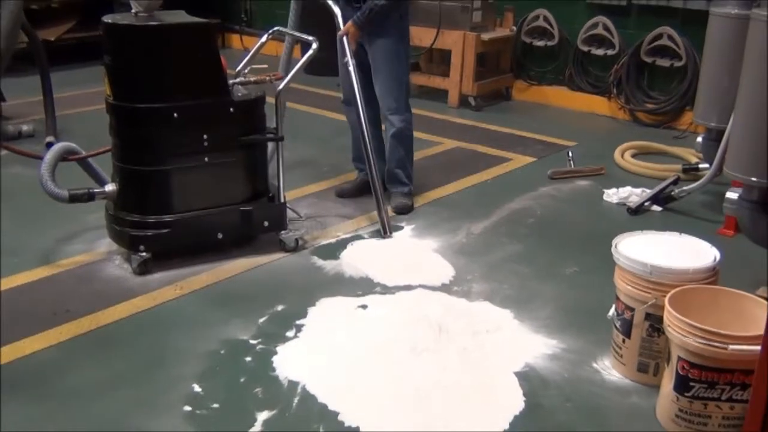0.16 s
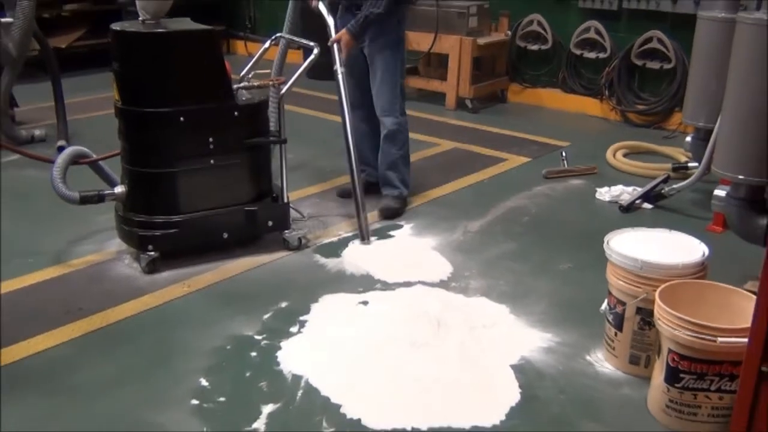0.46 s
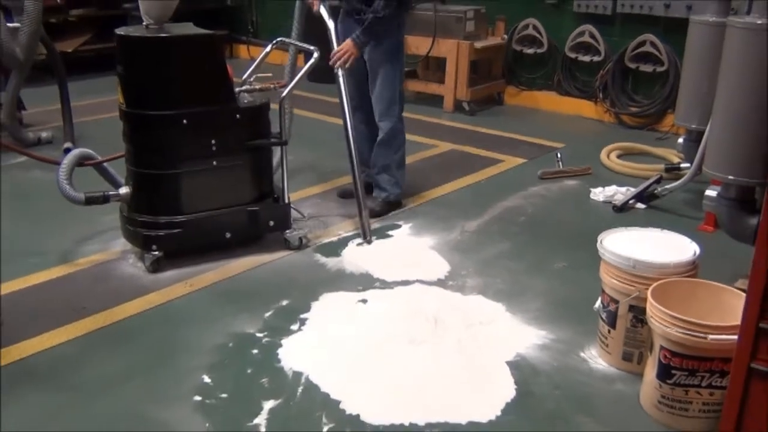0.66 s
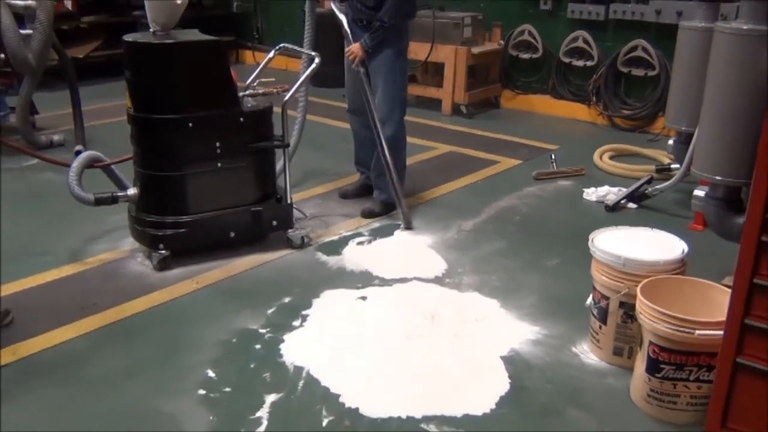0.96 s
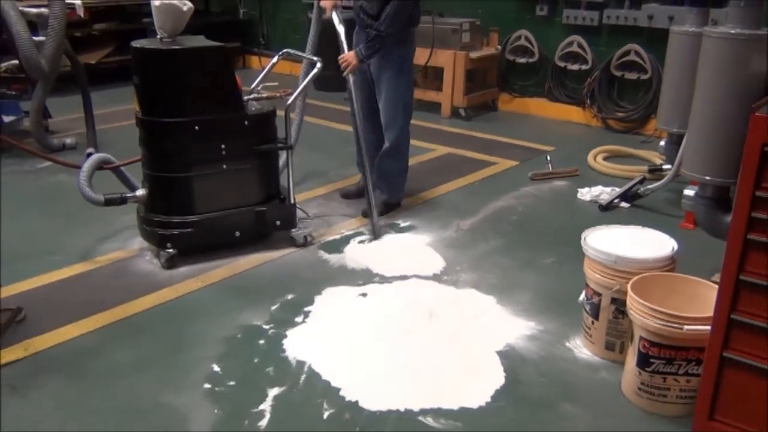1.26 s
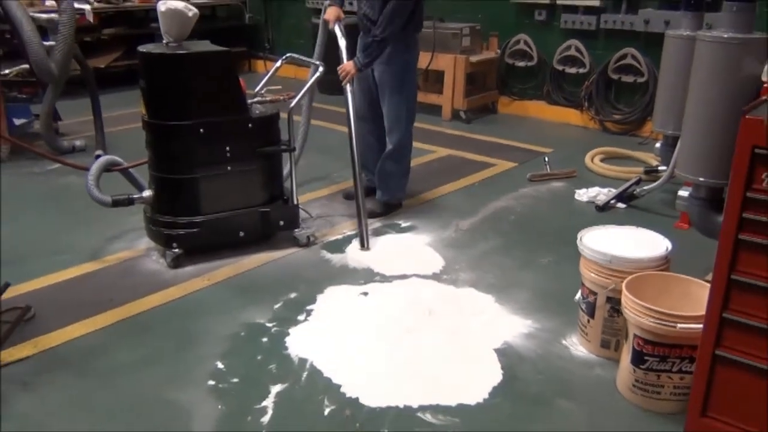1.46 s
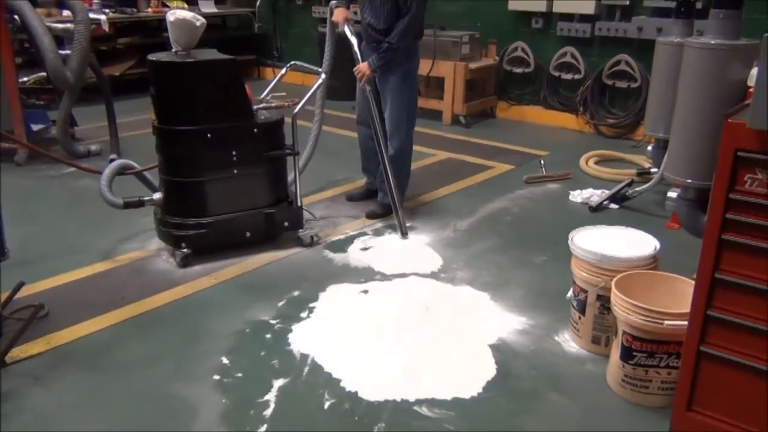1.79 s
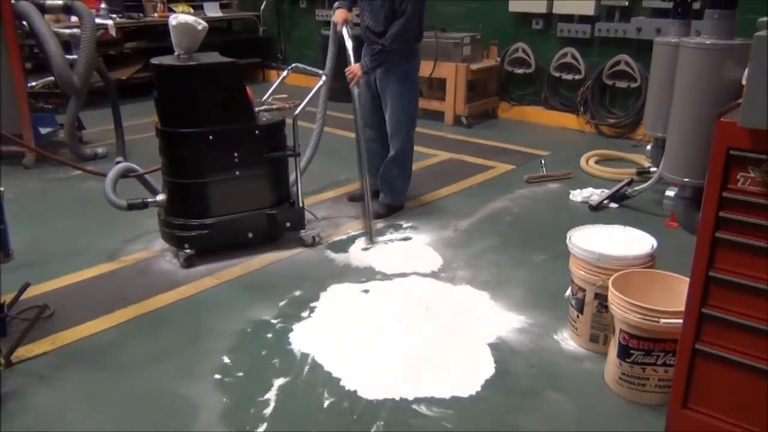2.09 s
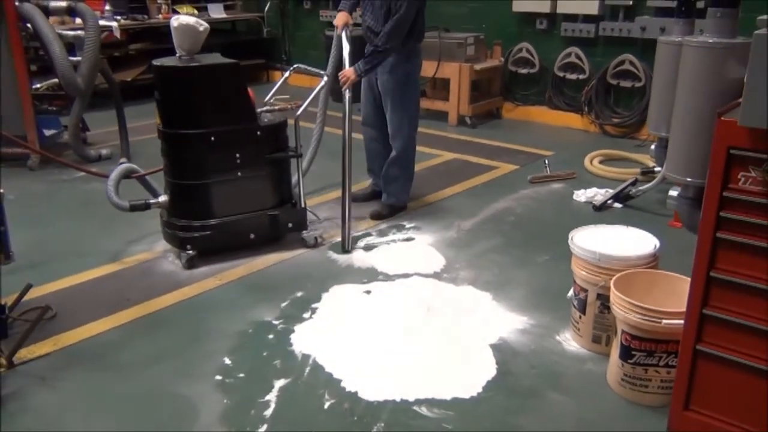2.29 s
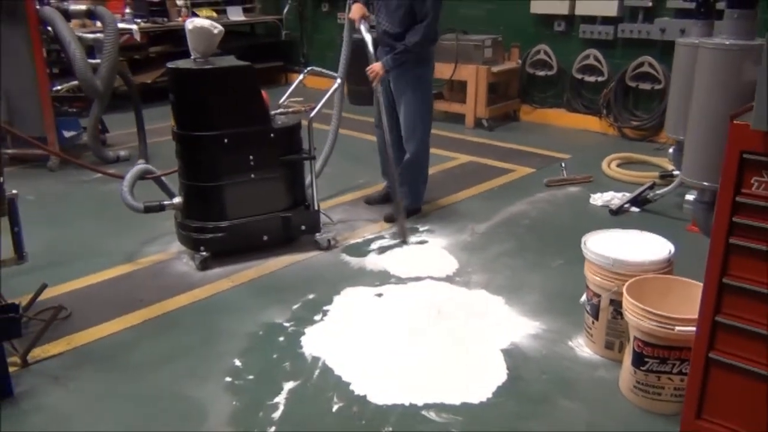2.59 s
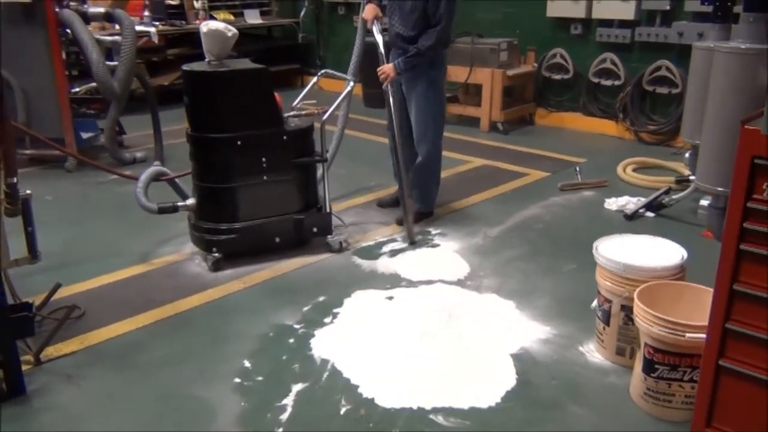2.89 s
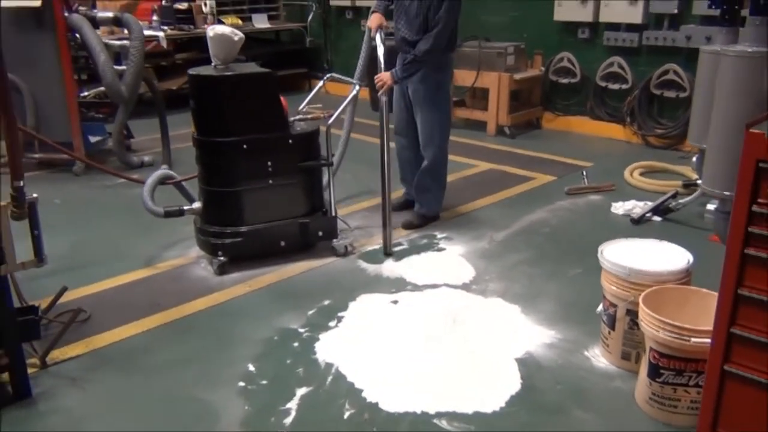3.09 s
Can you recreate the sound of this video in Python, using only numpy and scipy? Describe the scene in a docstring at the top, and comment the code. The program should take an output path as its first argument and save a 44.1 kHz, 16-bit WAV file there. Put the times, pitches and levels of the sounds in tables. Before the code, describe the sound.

Loud, steady industrial vacuum suction with a hollow midrange drum roar, airy hiss and thin wavering whistles. Gritty powder ticks through the metal wand, sparse at first, then busier, with slight workshop echo and faint mains hum.

```python
"""First comes the roar of a compressed-air vacuum at full suction: noise shaped by drum resonances, with gusts.
Over it the nozzle hisses as the wand sweeps, bands of air swell and fade as filtered noise,
and three thin whistles, near sines, waver in the air stream.
Clumps of powder rattle up the wand as ringing bursts of grains that echo in a large workshop.
Steady tones of mains hum lie below."""
import sys
import numpy as np
from scipy import signal
from scipy.fft import rfft, irfft, next_fast_len
from scipy.io import wavfile

SR = 44100
rng = np.random.default_rng(int(sys.argv[2]) if len(sys.argv) > 2 else 0)


def log_audio(samples):
    """Write samples as a 16-bit WAV file to the path given in sys.argv[1]."""
    # one column per channel
    frames = np.atleast_2d(samples).T
    # limit to full scale, then quantise
    limited = np.clip(frames, -1, 1)
    pcm = np.round(limited * 32767).astype(np.int16)
    wavfile.write(sys.argv[1], SR, pcm)


N = 143325


def from_db(db):
    """Turn decibels into amplitude gain."""
    return 10 ** (np.asarray(db) / 20)


def rms_one(x):
    """Scale a signal to unit rms."""
    return x / np.sqrt(np.mean(x ** 2) + 1e-20)


def in_time(rows):
    """Draw each column of a time table as straight lines, one value per sample."""
    s, *columns = np.transpose(rows)
    return [np.interp(np.arange(N) / SR, s, c) for c in columns]


def drift(rate_hz):
    """Slow random wandering of unit rms: noise through two equal low-pass poles."""
    step = 40  # samples between slow values
    r = np.exp(-2 * np.pi * rate_hz * step / SR)
    noise = rng.standard_normal(N // step + 2002)
    slow = signal.lfilter([1], [1, -2 * r, r * r], noise)[2000:]  # drop the filter's settling
    return np.interp(np.arange(N) / step, np.arange(len(slow)), rms_one(slow))


def resonance(x, hz, width_hz):
    """Two-pole resonance with a gain of about 1 on top."""
    r = np.exp(-np.pi * width_hz / SR)
    zeros = np.array([1, 0, -1]) * (1 - r * r) / 2
    poles = [1, -2 * r * np.cos(2 * np.pi * hz / SR), r * r]
    return signal.lfilter(zeros, poles, x)


def twice_resonant(x, hz, first_width_hz, second_width_hz):
    """Two resonances in a row at one pitch, scaled to unit rms."""
    return rms_one(resonance(resonance(x, hz, first_width_hz), hz, second_width_hz))


def shelf(x, hz, side, db):
    """Lift or sink what lies on one side of hz."""
    low_or_high = signal.butter(3, hz, side, fs=SR, output="sos")
    return x + (from_db(db) - 1) * signal.sosfiltfilt(low_or_high, x)


def air(spectrum, peaks, patchy_db, own_db, rate_hz, centres_hz):
    """Turbulent noise of unit rms: a sloped spectrum, resonant humps and partly shared gusts."""
    hz = np.maximum(np.arange(N // 2 + 1) * SR / N, 1)
    f, db = np.transpose(spectrum)
    shape = np.interp(np.log(hz), np.log(f), db)
    octaves_outside = np.maximum(np.log2(f[0] / hz), 0) + np.maximum(np.log2(hz / f[-1]), 0)
    shape -= 30 * octaves_outside  # dB per octave beyond the table
    for centre, width, lift in peaks:
        shape += lift / (1 + (2 * (hz - centre) / width) ** 2)
    coloured = rfft(rng.standard_normal(N)) * from_db(shape)
    together = drift(rate_hz)
    out = 0
    for centre in centres_hz:
        distance = np.log(hz / centre) / np.log(centres_hz[1] / centres_hz[0])
        window = np.cos(np.pi / 2 * np.clip(distance, -1, 1)) ** 2
        gust_db = patchy_db * together + own_db * drift(rate_hz / 4)
        out = out + irfft(coloured * window, N) * from_db(gust_db)
    return rms_one(out)


# mains tones: pitch_hz [Hz], level_db [dB rms]
MAINS_TONES = [(59.8, -49), (118, -62), (179.5, -51)]


def hum():
    """Mains hum: steady sines with random starting phases."""
    t = np.arange(N) / SR
    out = np.zeros(N)
    for hz, db in MAINS_TONES:
        out += np.sqrt(2) * from_db(db) * np.sin(2 * np.pi * (hz * t + rng.random()))
    return out


SHOP_T60_S, SHOP_SHARE = .5, .4  # decay time in the bass, amplitude share of the echoes


def shop(x):
    """Eight feedback delays between the walls, duller on every round; level kept."""
    size = next_fast_len(N + SR)
    hz = np.arange(size // 2 + 1) * SR / size
    lags_s = np.array([.0231, .0277, .0313, .0359, .0411, .0457, .0509, .0583])
    t60 = SHOP_T60_S / (1 + hz / 9000)
    walls = 0
    for lag in lags_s:
        g = from_db(-60 * lag / t60) * np.exp(-2j * np.pi * hz * lag)  # one round trip
        walls = walls + g / (1 - g) * np.sqrt(1 - abs(g) ** 2) / abs(g)
    walls = walls / np.sqrt(len(lags_s))
    mix = np.sqrt(1 - SHOP_SHARE ** 2) + SHOP_SHARE * walls
    return irfft(rfft(x, size) * mix, size)[:N]


CLUMP_GRAINS_PER_S, CLUMP_WIDTH = 1500, .22  # strong grains, ring width as a share of its pitch
CLUMP_CRACK_DB = -14.0  # bright crack against the ring


def clump(hz, ms):
    """A burst of grains rings the wand and adds a bright crack; it rises faster than it fades."""
    t = (np.arange(2048) - 512) / SR  # zero at the peak
    born, size = rng.random((2, len(t)))
    strength = 0.35 + 3 * (born < CLUMP_GRAINS_PER_S / SR)  # fine bed and strong grains
    grains = strength * (size - .5)
    width_hz = CLUMP_WIDTH * hz
    ring = twice_resonant(grains, hz, width_hz, 1.6 * width_hz)
    crack = rms_one(resonance(grains, 5900, 7000))
    shape = np.exp(-(t / np.where(t < 0, .28, .75) / ms * 1000) ** 2)
    burst = (ring + from_db(CLUMP_CRACK_DB) * crack) * shape
    # scale so the burst's energy is twice the envelope's, whatever the grains
    return burst * np.sqrt(2 * np.sum(shape ** 2) / np.sum(burst ** 2))


GRIT_PER_S, GRIT_DB, GRIT_HZ = 310, -47.5, 5940  # loose grit between the clumps


def grit(sweep_db):
    """Random single grains tick through two wand resonances, louder and softer with the sweep."""
    ticks = (rng.random(N) < GRIT_PER_S / SR) * rng.laplace(0, 1, N) + 1e-18
    ringing = twice_resonant(ticks, GRIT_HZ, 1800, 3000)
    return from_db(GRIT_DB + sweep_db - sweep_db.mean()) * ringing


# clumps of powder in the wand: peak_s [s], level_db [dB, relative], centre_hz [Hz], length_ms [ms]
CLUMPS = [(0.411, -32, 6500, 4.4), (0.424, -30.5, 5700, 5), (0.557, -36, 6500, 5.5),
          (.7244, -33, 6200, 4.6), (.818, -47, 12500, 6), (0.849, -34, 5600, 4), (1.185, -29.5, 5930, 4.4),
          (1.2922, -34, 5730, 5), (1.6597, -35, 4900, 4.6), (1.673, -35, 6200, 3.6), (2.329, -34, 5000, 5),
          (2.4184, -35, 6100, 4), (2.435, -36, 5400, 6), (2.477, -42, 5000, 4), (2.5232, -30, 5300, 3.4),
          (2.542, -32.5, 6300, 9.6), (2.577, -40, 5550, 4), (2.603, -30.5, 5370, 9), (2.605, -41, 9100, 11),
          (2.634, -35, 5600, 6), (2.691, -34.5, 4960, 11), (2.806, -35, 5000, 4), (2.896, -30.5, 5930, 6),
          (2.9603, -29, 5530, 4.6), (3.0295, -29.5, 5600, 6), (3.0454, -33, 5000, 6), (3.101, -43, 5500, 4),
          (3.205, -35, 5800, 4.4), (3.231, -30.5, 5640, 8.4), (3.231, -45, 13000, 6)]


def powder(sweep_db):
    """Clumps rattle up the wand, and loose grit ticks in between."""
    out = np.zeros(N + 2048)
    for s, db, hz, ms in CLUMPS:
        burst = clump(hz, ms)
        start = int(s * SR) - 512
        out[start:start + len(burst)] += from_db(db) * burst
    return out[:N] + grit(sweep_db)


def whistle(ends_hz, rows, waver_hz, flutter_db, order=1):
    """A near sine that creeps up in pitch, wanders a little and flutters in strength."""
    db, = in_time(rows)
    pitch_hz = np.linspace(*ends_hz, N) + waver_hz * drift(20)
    phase = 2 * np.pi * order * np.cumsum(pitch_hz) / SR
    return np.sqrt(2) * from_db(db + flutter_db * drift(15)) * np.sin(phase)


# strength of each whistle before flutter: time_s [s], level_db [dB rms]; the thin one's is its octave's
LOW_WHISTLE = [(0, -31), (.18, -31.5), (.22, -38), (.35, -35.5), (.5, -35.5), (.6, -45), (.7, -36),
               (.82, -36.5), (.89, -49), (1.04, -35.5), (1.1, -45), (1.18, -35), (1.29, -33), (1.36, -40),
               (1.53, -48), (1.64, -36), (1.75, -46), (1.82, -34), (1.89, -39), (1.98, -33), (2.15, -36),
               (2.37, -34), (2.43, -39), (2.65, -41), (2.73, -35), (3.0, -37), (3.11, -32), (3.25, -36)]
HIGH_WHISTLE = [(0, -46), (.07, -43), (.17, -50), (.33, -41), (.41, -47), (.48, -41), (.55, -47),
                (.63, -41), (.8, -43), (.93, -54), (.99, -42), (1.09, -53), (1.18, -35.5), (1.22, -47),
                (1.28, -42), (1.36, -52), (1.52, -41), (1.62, -47), (1.95, -48), (2.15, -44), (2.47, -51),
                (2.57, -37), (2.66, -44), (2.74, -50), (2.8, -36), (2.86, -47), (3.06, -38.5), (3.12, -53),
                (3.25, -46)]
THIN_WHISTLE = [(0, -59), (.5, -55), (.76, -50), (.9, -58), (1.13, -49), (1.4, -56), (2.05, -51),
                (2.3, -56), (2.6, -52), (3.05, -51), (3.25, -57)]
LOW_HZ, HIGH_HZ, THIN_HZ = (2143, 2151), (4077, 4090), (2354, 2359)  # pitch at start and end
THIN_FUNDAMENTAL_DB = 2.0  # above its octave


def whistles():
    """Three thin tones in the air stream, the thinnest with an octave that wavers on its own."""
    low = whistle(LOW_HZ, LOW_WHISTLE, waver_hz=.8, flutter_db=.6)
    high = whistle(HIGH_HZ, HIGH_WHISTLE, waver_hz=2.5, flutter_db=2.4)
    octave = whistle(THIN_HZ, THIN_WHISTLE, waver_hz=1.5, flutter_db=1.5, order=2)
    thin = whistle(THIN_HZ, THIN_WHISTLE, waver_hz=1.5, flutter_db=1.5)
    return low + high + octave + from_db(THIN_FUNDAMENTAL_DB) * thin


def singing(rows, hz, width_hz):
    """Noise through the same resonance twice, swelling and fading."""
    db, = in_time(rows)
    return from_db(db) * twice_resonant(rng.standard_normal(N), hz, width_hz, width_hz)


# bands of singing air: time_s [s], level_db [dB rms]
THROAT = [(0, -43), (.6, -36), (1.1, -26), (1.5, -32), (1.9, -28.5), (2.35, -28.5), (2.7, -24.5),
          (3.25, -31)]  # sings louder as powder chokes the flow
MOUTH = [(0, -42), (.25, -39), (.55, -39), (.8, -48), (1.1, -49), (1.6, -58), (3.25, -56)]  # wand mouth dragging on the floor
BODY = [(0, -28), (.3, -24.5), (.7, -27), (1.3, -32), (2.4, -33), (2.7, -28), (3.25, -36)]  # fuller roar just above the drum note at first
DRUM_NOTE = [(0, -31), (1.4, -26), (3.25, -32)]  # narrow wavering note under the drum's main hump
HIGH_BAND = [(0, -44), (.4, -40.5), (.85, -49), (1.3, -64), (3.25, -58)]  # high hiss, strong at first, then fading


def singing_bands():
    """Air sings in the throat, wand mouth and drum, with a broad high band of hiss."""
    throat = singing(THROAT, hz=1055, width_hz=154)
    mouth = singing(MOUTH, hz=4185, width_hz=240)
    body = singing(BODY, hz=648, width_hz=180)
    drum_note = singing(DRUM_NOTE, hz=423, width_hz=11)
    high_band = singing(HIGH_BAND, hz=6820, width_hz=2600)
    return throat + mouth + body + drum_note + high_band


# spectrum of the nozzle's hiss: pitch_hz [Hz], density_db [dB per Hz, relative]
HISS = [(1650, -30), (2800, 2), (3020, -4), (3390, -0.5), (3830, -1), (4130, 1.5), (4360, -2.5), (5360, -2),
        (6480, -8.5), (7330, -7), (7960, -14.5), (11200, -17.5), (14300, -29)]
# air resonances of the wand: pitch_hz [Hz], width_hz [Hz], lift_db [dB]
WAND = [(3277, 32, 8.5), (3454, 36, 5), (3660, 45, 3.5), (4440, 200, 0.5), (5960, 89, -4), (5460, 230, 1.5),
        (6200, 150, 1), (7400, 220, 2.5), (8400, 520, 5.5), (9300, 400, 6), (10700, 150, 1)]
HISS_BANDS_HZ = 1250 * 2 ** (np.arange(12) / 3)  # bands with gusts of their own


def hiss(sweep_db, bright_db, top_db):
    """Nozzle turbulence coloured by the wand; level and treble move with the sweep."""
    noise = air(HISS, WAND, patchy_db=.85, own_db=1.3, rate_hz=17.0, centres_hz=HISS_BANDS_HZ)
    swept = from_db(sweep_db + 3.5) * noise
    bright = shelf(swept, 7800, "high", bright_db)
    return shelf(bright, 9800, "high", top_db)


# spectrum of the jets in the drum: pitch_hz [Hz], density_db [dB per Hz, relative]
ROAR = [(12, -46), (25, -37), (48, -39), (84, -50), (97, -34.5), (132, -40.5), (152, -26), (230, -24),
        (275, -17), (345, -16.5), (415, -10), (445, -6.5), (470, -3.5), (522, -3.5), (535, -10), (700, -11),
        (934, -12), (1150, -16), (1260, -18), (2090, -20.5), (2640, -33.5), (3200, -49), (4160, -67),
        (7040, -120)]
# air resonances of drum and exhaust: pitch_hz [Hz], width_hz [Hz], lift_db [dB]
DRUM = [(166, 16, 5), (487, 22, 3), (510, 8.7, 1.5), (583, 32, 2.5), (665, 11, 3), (1096, 47, 3),
        (1388, 110, 3), (1606, 48, 5), (1994, 53, 4), (2470, 100, 3.5), (2720, 37, -7)]
ROAR_DB = -17  # rms before the bass shelf
ROAR_BANDS_HZ = 15.625 * 2 ** np.arange(10)  # bands with gusts of their own
BASS_HZ, BASS_START_DB, BASS_END_DB = 330, 2, -2.2  # the bass thins slowly


def roar():
    """Air jets roar in the steel drum: gusting noise with drum humps and thinning bass."""
    noise = air(ROAR, DRUM, patchy_db=0.88, own_db=0.4, rate_hz=30.0, centres_hz=ROAR_BANDS_HZ)
    bass_db = np.linspace(BASS_START_DB, BASS_END_DB, N)
    return shelf(from_db(ROAR_DB) * noise, BASS_HZ, "low", bass_db)


def level_dip():
    """Gain with one brief, smooth dip of 3.5 dB."""
    dip_s, length_s, depth_db = 1.315, .008, -3.5
    t = np.arange(N) / SR
    return from_db(depth_db * np.exp(-((t - dip_s) / length_s) ** 2))


# wand sweep: time_s [s], level_db [dB, relative], bright_db [dB above 7.8 kHz],
# top_db [further dB above 9.8 kHz]
SWEEP = [(0, -39.5, 4, 2), (.3, -36.5, -0.5, -0.5), (.55, -40, 2.7, 0.5), (.78, -35.5, 1.5, -0.5),
         (.92, -38.5, 1, 2.5), (1.2, -37, -.3, 3), (1.45, -40, 2.3, 1), (1.66, -36, -.3, 2),
         (1.9, -40, -6.5, 11), (2.1, -38, -2, 4), (2.3, -39.5, -.6, 6), (2.55, -37, 1.2, 3.5),
         (2.8, -38.5, .1, 1), (3.05, -37.5, 0.5, 4), (3.25, -37.5, .4, 2.5)]


def scene():
    """Mix to one channel: the vacuum's air with its dip, powder in the shop, and hum."""
    sweep_db, bright_db, top_db = in_time(SWEEP)
    vacuum = roar() + hiss(sweep_db, bright_db, top_db) + singing_bands() + whistles()
    mix = level_dip() * vacuum + shop(powder(sweep_db)) + hum()
    return mix[None]


def record(dry):
    """Round the peaks softly, then cut the top steeply."""
    rounded = .9 * np.tanh(dry / .9)
    top_cut = signal.cheby2(14, 45, 14660, fs=SR, output="sos")  # 45 dB down from 14660 Hz
    return signal.sosfilt(top_cut, rounded)


dry = scene()
out = record(dry)
log_audio(out)
```